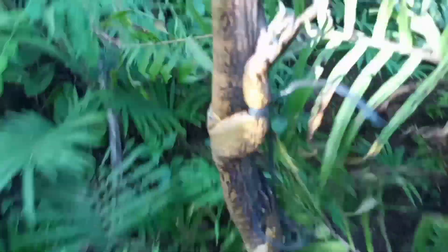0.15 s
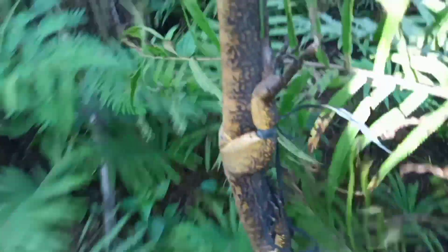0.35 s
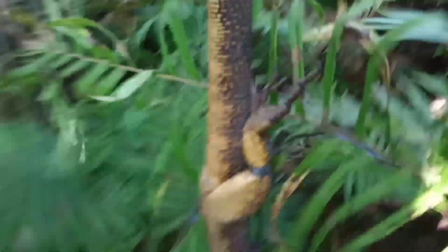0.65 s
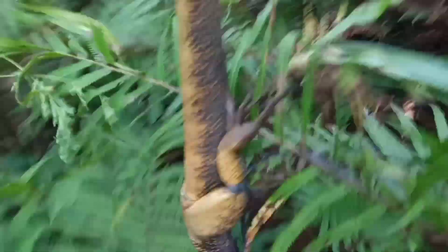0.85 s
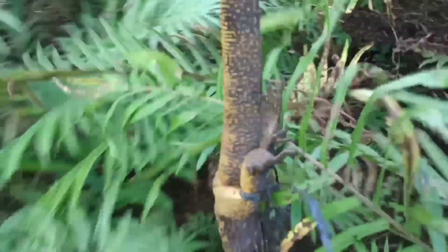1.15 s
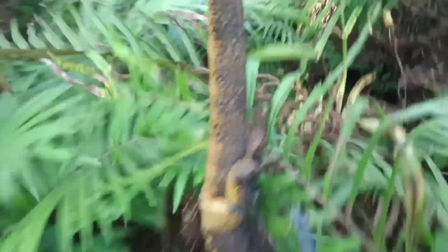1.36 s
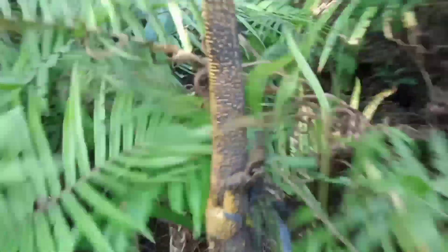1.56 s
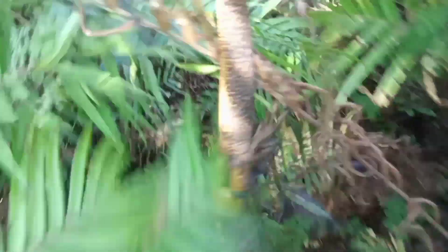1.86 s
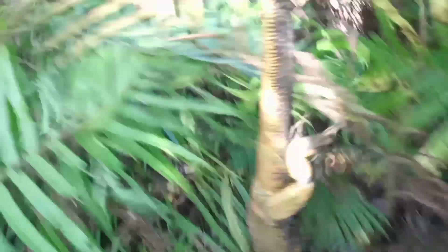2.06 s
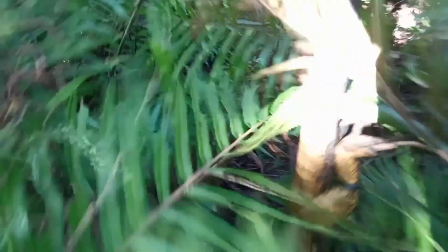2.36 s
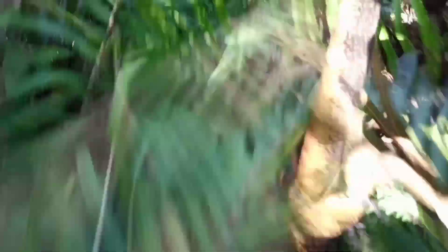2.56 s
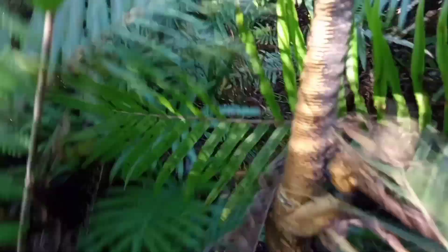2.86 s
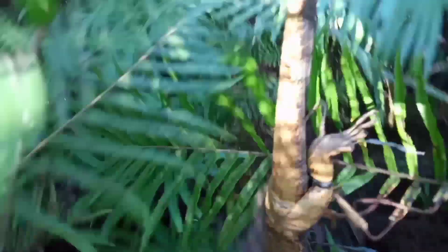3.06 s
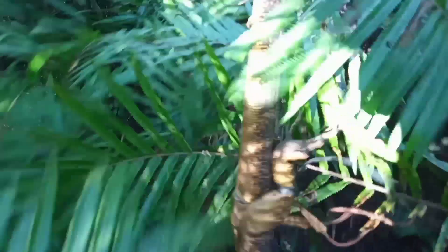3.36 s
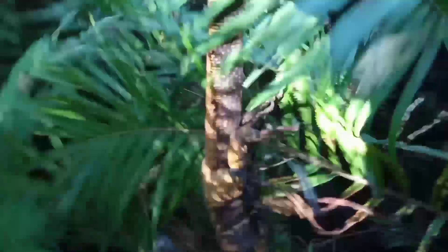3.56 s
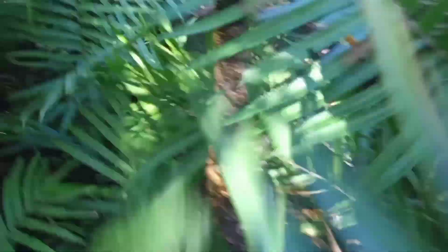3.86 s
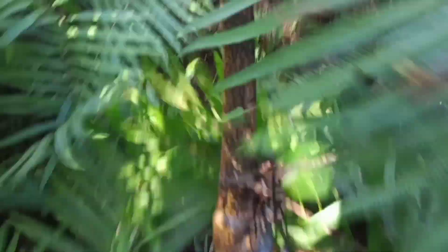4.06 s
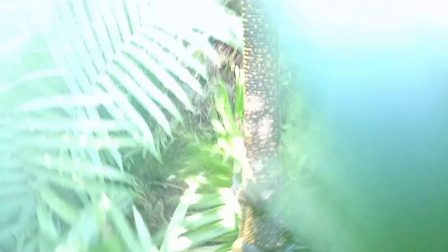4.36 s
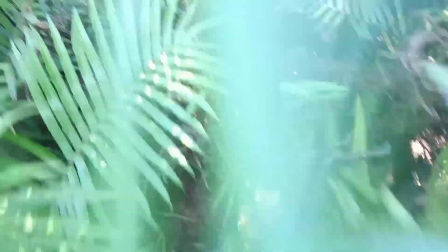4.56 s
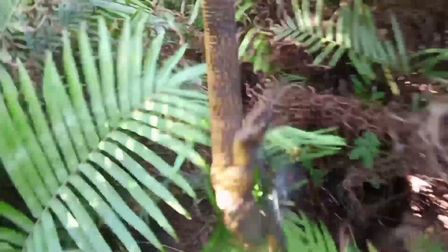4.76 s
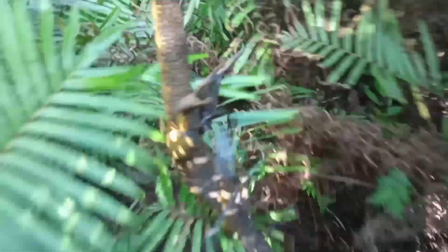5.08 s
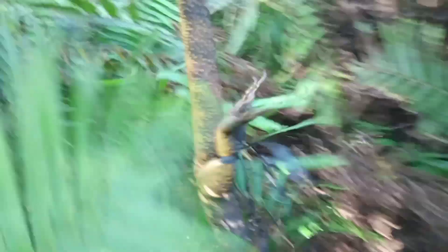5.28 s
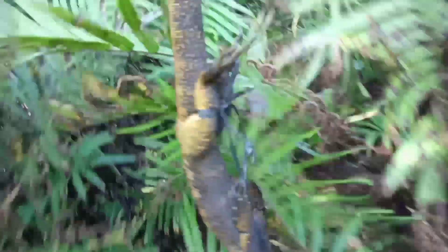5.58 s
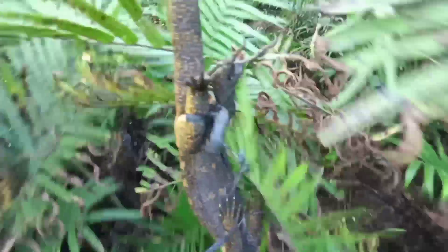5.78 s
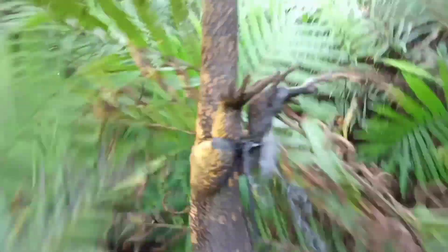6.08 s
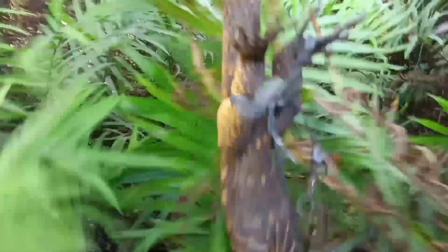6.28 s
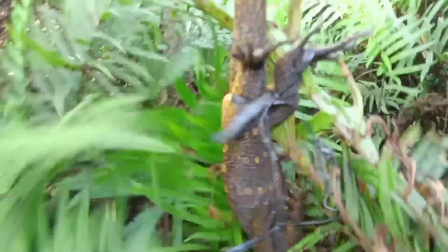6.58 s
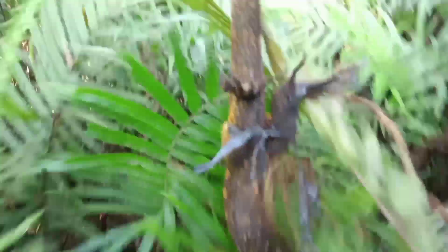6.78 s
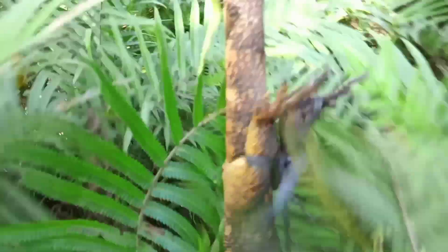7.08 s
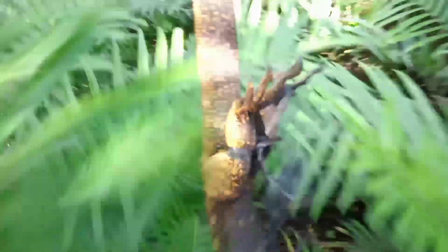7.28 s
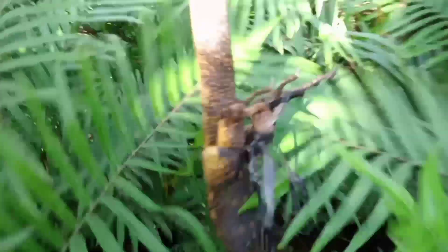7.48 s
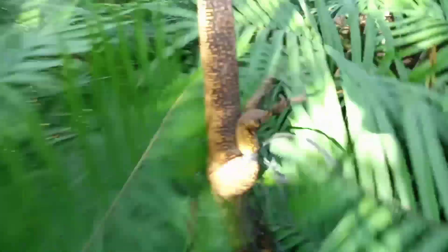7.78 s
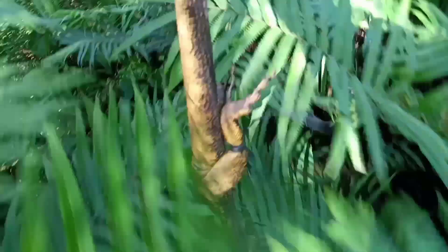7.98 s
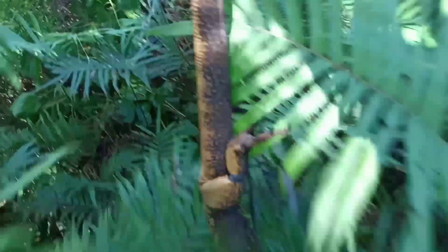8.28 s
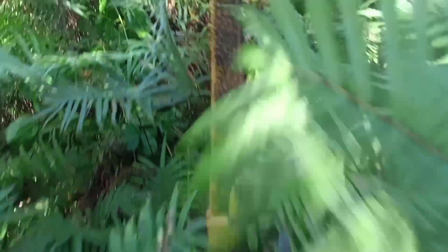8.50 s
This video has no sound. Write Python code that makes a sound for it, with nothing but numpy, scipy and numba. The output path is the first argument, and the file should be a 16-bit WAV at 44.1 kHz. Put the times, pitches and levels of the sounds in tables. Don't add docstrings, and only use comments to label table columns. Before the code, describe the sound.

Someone wades through chest-high dry ferns outdoors, the microphone inside a small hand-carried case. Leaves rustle continuously with tiny snaps and ticks, light at first, then denser. Stalks crack sharply just before three seconds, stems thump and drag on the case, and a heavy scrape follows near four and a half seconds. More knocks come at six and seven seconds, easing to soft rustling over a faint low rumble.

```python
import sys
import numpy as np
from scipy import signal
from scipy.fft import rfft, irfft
from scipy.io import wavfile
from scipy.ndimage import uniform_filter1d
from numba import njit

SR = 44100
rng = np.random.default_rng(int(sys.argv[2]) if len(sys.argv) > 2 else 0)


def level_to_linear(level):
    exponent = np.asarray(level, float) / 20
    return 10 ** exponent


def pcm_store(signal):
    levels = np.round(np.clip(np.atleast_2d(signal), -1, 1) * 32767)
    wavfile.write(sys.argv[1], SR, levels.astype(np.int16).T)


N = 381024

# frequency in Hz, density in dB per Hz.
RUMBLE_SPECTRUM = [(15, -54), (25, -2), (80, 13), (118, 5.5), (146, 8), (233, -22), (458, -13), (500, -13),
                   (650, -30), (1100, -120)]
RUMBLE_DB = -46

# frequency in Hz, gain in dB.
PORT_RESPONSE = [(300, -29.5), (500, -9.5), (800, -9), (1400, -7.5), (2000, -3.5), (3000, -1), (3750, 0.5),
                 (4500, -8.5), (5250, -10.5), (6500, -9), (8100, -3), (10500, -14), (14500, -14),
                 (15400, -16)]
# frequency in Hz, width in Hz, gain in dB.
CASE_MODES = [(120, 48, 1), (181, 45, -3), (279, 76, -7), (409, 470, -2.5)]

# middle in seconds, peak in dB, pitch in Hz.
THRUMS = [(.265, -23, 120), (.3, -26, 150), (.33, -28, 125), (2.722, -25, 690), (2.725, -25, 285),
          (2.762, -23, 135), (2.824, -24, 390), (2.872, -21, 225), (4.385, -26, 230), (4.41, -24, 135),
          (4.475, -24, 225), (4.49, -27, 480), (4.535, -21, 120), (4.567, -22, 210), (4.602, -16, 225),
          (4.624, -23, 480), (4.652, -20, 150), (4.652, -20, 390), (4.704, -15, 315), (4.729, -16, 300),
          (4.732, -17, 600), (4.747, -15, 360), (4.759, -19, 135), (4.881, -25, 405), (6.28, -22, 165),
          (6.342, -24, 180), (6.355, -25, 285), (6.38, -22, 390), (6.385, -19, 150), (6.405, -21, 270),
          (6.425, -20, 210), (6.427, -18, 390), (6.465, -23, 390), (6.47, -18, 255), (6.539, -25, 270),
          (6.649, -22, 210), (6.682, -15, 195), (6.719, -21, 180), (6.739, -21, 405), (6.764, -17, 180),
          (6.791, -24, 255), (7.05, -23, 270), (7.12, -13, 195), (7.155, -14, 255), (7.21, -23, 150)]
# time in seconds, peak in dB, hardness from 0 to 1, struck panel's pitch in Hz.
KNOCKS = [(0.219, -8, 0.14, 195), (0.23, -6.5, 0.65, 220), (0.238, -18, 0.7, 91.5), (1.601, -18.5, 1, 250),
          (1.891, -11, 0.56, 340), (2.551, -13.5, 0.93, 540), (2.948, -2.5, 0.75, 572),
          (2.96, -20, 0.8, 575), (3.701, 0, 0.42, 205), (3.715, -11, 0.8, 380), (3.774, -10.5, 0.73, 272),
          (4.591, -9.5, 0.36, 129), (4.695, -1, 0.14, 120), (4.716, -7, 0.3, 115), (4.853, -18, 0.2, 143),
          (6.1775, -2.5, 1, 720), (6.204, -11, 0.22, 135), (6.259, -15, 0.26, 129),
          (7.007, -12.5, 0.73, 161), (7.096, -1.5, 0.4, 223), (7.11, -7, 0.13, 205),
          (7.129, -10.5, 0.1, 121), (7.152, -1.5, 0.33, 112), (7.233, -14, 0.74, 186)]
# time in seconds, rise in seconds, fall in seconds, level in dB, upper modes in dB above it.
DRAGS = [(0, .01, 0.06, -33, 0), (.215, 0.024, .07, -26.5, -8), (.27, 0.05, 0.3, -29, -20),
         (5.52, 0.47, 0.27, -42.5, -15), (1.7, 0.48, 0.17, -41.5, -2), (1.89, .015, .14, -30.5, 1),
         (2.74, 0.19, 0.39, -31, 0), (2.9, 0.19, 0.27, -31.5, -4), (3.701, 0.012, 0.1, -24, -2),
         (4.09, 0.034, 0.25, -38.5, 1.5), (4.35, 0.011, .7, -31, -1), (4.63, .25, 0.18, -31, -0.5),
         (4.71, .03, 0.14, -23, 0), (4.87, 0.063, 0.07, -31, -2), (6.18, 0.027, 0.08, -34, 5),
         (6.25, .07, .15, -35, -14), (6.4, 0.085, 0.087, -29, -1), (6.47, 0.1, 0.2, -26, -3),
         (6.66, 0.08, 0.1, -28, -5), (6.74, 0.088, 0.12, -31, 0), (7.01, .01, 0.22, -33, 3),
         (7.105, 0.014, 0.11, -23, 0), (7.17, .05, 0.039, -28, -10), (7.22, .03, 0.12, -41, -18)]
DRAG_EDGE_DB = 19.5
CARRY_DB, CARRY_UPPER_DB = -48.5, -1.5
GRIT_DB = -12.

# start in seconds, length in seconds, pitch in Hz, width in Hz, level in dB.
ZIPS = [(0.69, 0.058, 3200, 2100, -27.5), (1.808, 0.024, 3750, 590, -26), (1.834, .022, 3750, 700, -27.5),
        (1.855, .028, 3600, 800, -23), (1.89, .045, 3300, 1500, -29), (3.296, 0.059, 1110, 540, -31.5),
        (4.71, 0.043, 3100, 2400, -25), (4.695, .015, 3300, 1300, -23), (0.547, 0.062, 3700, 740, -36),
        (1.68, .12, 3630, 1500, -31), (2.949, .021, 3500, 2000, -14.5), (2.789, 0.056, 1150, 350, -27.5),
        (6.397, 0.026, 2700, 1500, -28.5), (2.781, 0.0075, 3500, 700, -13), (4.194, 0.038, 1300, 1200, -32),
        (8.214, 0.052, 3500, 2500, -32), (8.372, .07, 3100, 2000, -35), (8.585, .025, 950, 1000, -37),
        (8.615, .024, 3200, 2000, -32), (4.63, 0.15, 480, 450, -27.5), (3.7, .06, 750, 560, -34),
        (1.885, .03, 1500, 1800, -31), (4.57, .1, 900, 700, -33), (7.09, 0.084, 294, 150, -26.5),
        (0.99, 0.017, 1600, 1800, -39)]
# start in seconds, length in seconds, pitch in Hz, width in Hz, level in dB.
FLUTTERS = [(0.666, 0.027, 8250, 1500, -40), (2.648, .035, 8000, 1800, -22.5),
            (4.733, 0.022, 6300, 4000, -21), (6.817, .02, 8400, 1800, -21.5), (5.79, .04, 7500, 4000, -34),
            (.115, .05, 6200, 2500, -39), (1.08, .06, 8200, 900, -36), (1.16, .05, 7300, 1500, -38),
            (1.53, .05, 6700, 800, -36), (4.705, .03, 6000, 4000, -26), (6.68, .15, 5900, 1500, -35),
            (4.98, .14, 5600, 2000, -42), (3.2, .1, 5800, 1500, -37), (7.6, .12, 5500, 2000, -43),
            (7.8, .5, 5800, 2000, -43), (.215, .014, 6500, 5000, -30), (2.46, .03, 6000, 900, -31),
            (7.19, .06, 8400, 1200, -30), (8.2, .07, 7500, 3000, -37)]
# start in seconds, length in seconds, first pitch in Hz, last pitch in Hz, level in dB.
SLIDES = [
    (0, .03, 2450, 2400, -39),
    (.02, .016, 2500, 2500, -34),
    (.034, .013, 2420, 2600, -25.5),
    (.047, .02, 2600, 2430, -27.5),
    (.066, .05, 2580, 2560, -35),
    (.115, .07, 2550, 2620, -40),
    (5.215, 0.19, 2260, 1650, -36.5),
    (5.34, 0.086, 1780, 2100, -31.5),
]
SLIDE_WIDTH_HZ = 330

# time in seconds, peak in dB, ring in
# Hz.
TICKS = [(.2104, -10, 8600), (.4319, -21, 8260), (.4843, -11, 9300), (.5884, -20, 8260), (.5821, -12, 8700),
         (.726, -14, 8600), (.8091, -15, 7500), (1.2451, -14, 6650), (1.536, -20, 9500), (1.721, -17, 8360),
         (1.8756, -15, 8420), (2.3082, -8, 8400), (6.8054, -13, 7440), (2.7393, -2.5, 8400),
         (2.7955, -2, 7980), (2.804, -2, 8000), (2.8684, -4, 7800), (2.8814, -5, 7990), (3.022, -18, 7780),
         (3.2013, -13, 8030), (3.9679, -13, 8500), (4.2627, -12, 8390), (4.6947, -9, 8280),
         (4.8444, -11, 8400), (5.8204, -11, 5050), (6.0417, -12, 7940), (6.623, -5.5, 7200),
         (6.8227, -0.5, 8240), (7.0473, -5, 8140), (7.7189, -16, 7740),
         (.052, -24, 8500), (.2992, -21, 10000), (.4572, -22, 7840), (.787, -19, 6000), (.4995, -15, 9600),
          (.5055, -19, 7600), (.513, -15, 9300), (.523, -18, 8000), (.527, -17, 7700), (.537, -16, 7900),
          (.5405, -13, 9400), (.553, -17, 8300), (.5575, -11, 8200), (.5615, -15, 9200), (.5655, -17, 8600),
          (.5745, -19, 7800), (.683, -16, 8000), (.757, -19, 8800), (.779, -19, 8600), (.8165, -16, 7700),
          (1.129, -19, 6100), (1.136, -18, 6000), (1.34, -21, 6400), (1.369, -23, 6300), (2.595, -11, 7400),
          (2.605, -11, 7000), (3.026, -12, 9600), (4.2996, -15, 9000), (5.401, -13, 8000), (5.8, -15, 5200),
          (7.145, -10, 9000)]
# time in seconds, peak in dB, ring in Hz, hollow body in dB above
CRACKS = [(.2094, -17, 1160, -14), (.2199, -9, 1710, -22), (.3755, -14.5, 1850, -20),
          (.6629, -20.5, 3830, -6), (.8445, -16, 3250, -22), (.8674, -20, 2340, -11),
          (1.0814, -17.5, 2260, -23), (1.296, -9, 2200, -19), (1.782, -18, 3410, -7),
          (1.7744, -21, 1300, -5), (2.0413, -16, 3770, -20), (2.2243, -15, 3920, -21),
          (2.3082, -7.5, 3170, -20), (2.382, -13, 3770, -25), (2.5513, -8.5, 3160, -5),
          (2.7831, 3.5, 3400, -12), (2.9467, 2, 2200, -11), (2.9524, 3, 3900, -13), (2.9589, 0, 3350, -27),
          (3.6925, -9, 2922, -29), (3.6974, -4, 980, -16), (4.2068, -18, 1656, -5), (4.564, -15, 3560, -6),
          (4.6947, -7, 3600, -8), (5.3406, -16.5, 1640, -11), (5.3842, -13, 3540, -4.5),
          (5.8197, -14, 3000, -31), (6.1779, -8, 1100, -4), (6.4023, -13, 2890, -31),
          (7.663, -17.5, 1210, -26),
          (.4838, -26, 3750, -25), (.5575, -25, 3700, -25), (.5821, -20, 3500, -25), (.902, -25, 3890, -20),
         (1.004, -22, 3900, -20), (1.394, -24, 2100, -15), (1.698, -19, 3960, -20), (1.895, -17, 1700, -4),
         (1.914, -14, 3500, -15), (2.542, -12, 3660, -25), (2.785, -12, 1230, -8), (3.267, -17, 2870, -20),
         (3.337, -16, 2500, -8), (4.452, -14, 3190, -20), (4.835, -17, 3770, -20), (5.084, -21, 1340, -20),
         (5.193, -22, 2620, -20), (5.371, -13, 2010, -20), (5.401, -14, 2600, -10), (5.749, -16, 3340, -20),
         (6.1779, -12, 1550, -20), (6.8, -14, 2350, -9), (6.825, -18, 1400, -15), (6.854, -17, 2600, -20),
         (7.004, -14, 3000, -12), (7.32, -15, 3660, -20), (8.594, -26, 1500, -6), (8.602, -26, 1500, -6)]

# time in seconds, pressure in dB, dryness of the fronds in dB.
WADE = [(0, -43, -0.5), (.45, -40.5, -3), (.96, -37, -4), (1.65, -38.5, -2), (2.0, -35, -4.5),
        (2.4, -29.5, 0.5), (3.13, -29.5, -1), (3.51, -30, -2), (4.06, -35, -2), (4.42, -31.5, -2),
        (4.86, -34.5, 1), (4.95, -38, -0.5), (5.3, -32.5, -3), (6.12, -32, 0.5), (6.3, -29.5, -3),
        (7.25, -27.5, -2), (7.66, -34, -3.5), (8.64, -34, -3.5)]
# time in seconds, rise in seconds, fall in seconds, pressure in dB, dryness in dB.
SWEEPS = [(.14, .04, .08, -40, 2), (.21, 0.04, 0.037, -33, -3), (.56, .08, .05, -50, 11),
          (.72, .1, 0.1, -35, -1), (1.11, .12, 0.22, -38.5, 5), (1.3, 0.015, 0.1, -36.5, 2.5),
          (1.72, .04, 0.14, -38, 8), (1.9, 0.11, 0.067, -31.5, 5.5), (2.19, 0.038, 0.3, -34.5, -4),
          (2.48, 0.12, .03, -33.5, 2.5), (2.72, 0.12, 0.059, -24.5, -0.5), (2.8, .03, 0.19, -26.5, 1),
          (2.98, 0.15, 0.081, -31.5, 7), (3.39, 0.13, 0.11, -46, -4), (4.11, .05, 0.067, -35.5, 1.5),
          (4.5, 0.076, 0.22, -27, 0), (4.6, 0.092, 0.15, -24.5, -7), (4.74, 0.085, 0.029, -24.5, -2),
          (5.41, 0.23, 0.019, -31, -4.5), (5.48, 0.019, 0.28, -30.5, -0.5), (6.16, .03, 0.24, -27.5, 1),
          (6.83, 0.27, 0.017, -29, 3.5), (7.04, 0.11, 0.17, -35.5, 7), (7.73, 0.08, 0.14, -37, 4),
          (8.12, 0.7, 0.37, -32, -3)]
SWEEP_EDGE_DB = 10
EDGE_SHAPE = 1.18
# time in seconds, snaps in dB over the hiss.
CRISPNESS = [(0, 1), (1.6, 2), (2.1, -1.5), (3.2, -2), (4.8, -1.5), (5.6, -3), (7.2, -3), (8.64, -3.5)]
# level in dB above the pressure, gain in dB per dB of dryness.
RUSTLE_PARTS = [(-10.5, 0.33), (-0.5, 0), (-0.5, 1), (-5.5, 1.12)]
RUSTLE_EDGES_HZ = (1550, 5200, 10000)


def level(x):
    return x / np.sqrt(np.mean(x ** 2))


def columns(table):
    s, *rest = np.transpose(table)
    return [np.interp(np.arange(N) / SR, s, c) for c in rest]


def walk(rate, count=8):
    steps = np.repeat(rng.standard_normal(int(N / SR * rate) + 2), count)
    steps = uniform_filter1d(uniform_filter1d(steps, count), count)
    return np.interp(np.arange(N) / SR * rate * count, np.arange(len(steps)), level(steps))


def ring(x, hz, width):
    return signal.lfilter(*signal.iirpeak(hz, hz / width, fs=SR), x)


def dull(x, hz):
    return signal.sosfilt(signal.butter(4, hz, fs=SR, output="sos"), x)


def colour(x, points, size=2048):
    hz, db = np.transpose(points)
    bins_hz = np.arange(size // 2 + 1) * SR / size
    gain = level_to_linear(np.interp(np.log(bins_hz + 1), np.log(hz), db))
    cep = irfft(np.log(gain))
    cep[1:size // 2] *= 2
    cep[size // 2 + 1:] = 0
    response = irfft(np.exp(rfft(cep)))
    return signal.fftconvolve(x, response)[:len(x)]


def between(spectrum, edges_hz, steep=3):
    octave = np.log2(np.arange(len(spectrum)) * SR / N + 1)
    slopes = [np.clip(.5 + steep * (octave - np.log2(edge)), 0, 1) for edge in edges_hz]
    above = [1, *slopes, 0]
    return [irfft(spectrum * (lower - upper), N) for lower, upper in zip(above, above[1:])]


def swells(rows, db, edge_db):
    t = np.arange(0, N, 32) / SR
    power = 0
    for (s, rise, fall, *_), top in zip(rows, db):
        away = np.maximum((s - t) / max(rise, .005), (t - s) / max(fall, .005))
        power = power + level_to_linear(2 * (top - edge_db * away ** EDGE_SHAPE))
    return np.interp(np.arange(N) / SR, t, power)


def snaps(rate, spread_db):
    hit = rng.random(N) < rate / SR
    sign = np.sign(rng.standard_normal(N))
    return hit * sign * level_to_linear(spread_db * np.minimum(rng.exponential(size=N), 3.8))


@njit
def grains(start, hz, cycles, size):
    out = np.zeros(N + 4096)
    for g in range(len(start)):
        p = np.exp((2j * np.pi - 1 / cycles[g]) * hz[g] / SR)
        z = size[g] + 0j
        for i in range(min(4096, int(5 * cycles[g] * SR / hz[g]))):
            z *= p
            out[start[g] + i] += z.imag
    return out[:N]


def burst(t60, splinter, size=1800):
    fade = np.exp(-np.log(1000) * np.arange(size) / SR / t60)
    x = splinter * rng.standard_normal(size) * fade
    x[0] = 1
    return x


def add(out, s, sound, peak_db):
    i = int((s + .0006) * SR)
    out[i:i + len(sound)] += (level_to_linear(peak_db) * sound / np.abs(sound).max())[:N - i]


def far_rumble(swell_db=1.5):
    bed = colour(rng.standard_normal(N), RUMBLE_SPECTRUM, size=8192)
    return level_to_linear(RUMBLE_DB + swell_db * walk(2.6)) * level(bed)


def thrums(gain_db=-2.5, length_200_s=.034, shorter=.4):
    out = np.zeros(N)
    for (s, db, hz), turn in zip(THRUMS, rng.random(len(THRUMS))):
        length = length_200_s * (200 / hz) ** shorter
        t = np.arange(int(length * SR)) / SR
        swell = np.sin(np.pi * t / length) ** 2
        add(out, s - length / 2, swell * np.sin(2 * np.pi * (hz * t + turn)), db + gain_db)
    return out


def case_modes(force):
    return [level_to_linear(db) * ring(force, hz, width) for hz, width, db in CASE_MODES]


def knocks(gain_db=-2.0, soft_s=0.0056, hard_s=0.00069, panel_db=9.5, width=0.19):
    out = np.zeros(N)
    for s, db, hardness, hz in KNOCKS:
        length = soft_s * (hard_s / soft_s) ** np.clip(hardness, 0, 1)
        push = np.sin(np.pi * np.clip(np.arange(3000) / SR / length, 0, 1)) ** 2
        panel = level_to_linear(panel_db) * ring(push, hz, width * hz)
        add(out, s, sum(case_modes(push)) + panel, db + gain_db)
    return out


def drag(rate=150., spread_db=2.5, smooth_db=-0.5, judder_db=3.0):
    slips = level(snaps(rate, spread_db)) + level_to_linear(smooth_db) * rng.standard_normal(N)
    force = level_to_linear(judder_db * walk(30)) * slips
    modes = case_modes(ring(ring(force, 216, 460), 226, 600))
    db, upper_db = np.transpose(DRAGS)[3:]
    low = np.sqrt(level_to_linear(2 * CARRY_DB) + swells(DRAGS, db, DRAG_EDGE_DB))
    upper = np.sqrt(level_to_linear(2 * (CARRY_DB + CARRY_UPPER_DB)) + swells(DRAGS, db + upper_db, DRAG_EDGE_DB))
    return low * level(modes[0] + modes[1]) + upper * level(modes[2] + modes[3])


def zips(rate=3000., spread_db=3.0, top_hz=4760.0):
    low, bright = np.zeros(N), np.zeros(N)
    clicks, scatter = snaps(rate, spread_db), rng.standard_normal(N)
    every = np.flatnonzero(clicks)
    runs = [(s, length, hz, hz, width, db) for s, length, hz, width, db in ZIPS + FLUTTERS]
    runs += [(*slide, SLIDE_WIDTH_HZ, db) for *slide, db in SLIDES]
    for s, length, from_hz, to_hz, width, db in runs:
        start = every[(every > s * SR) & (every < (s + length) * SR)]
        along = (start / SR - s) / length
        hz = from_hz + (to_hz - from_hz) * along + width / 4 * scatter[start]
        run = grains(start, hz, 0.63 * hz / width, clicks[start] * np.sin(np.pi * along))
        run = ring(run, (from_hz + to_hz) / 2, 2.5 * width + abs(to_hz - from_hz))
        out = bright if from_hz > top_hz else low
        out += level_to_linear(db) * run * np.sqrt(length * SR / np.sum(run ** 2))
    return dull(low, top_hz) + ring(bright, 8000, 7000)


def leaf_tips(gain_db=-5.5, t60=0.01, splinter=0.6, width=0.25, top_db=-12):
    out = np.zeros(N)
    for s, db, hz in TICKS:
        x = burst(t60, splinter, size=800)
        tick = ring(ring(x, hz, width * hz), hz, width * hz)
        add(out, s, tick + level_to_linear(top_db) * ring(x, 10000, 6000), db + gain_db)
    return out


def crack_t60(db, hz):
    shorter_db = 0.35 * db + 0.8 * np.log2(hz / 1000)
    return np.clip(.017 * level_to_linear(-shorter_db), .004, .07)


def stalks(gain_db=0., splinter=0.21, width=0.4, body_hz=720.0, edge_db=-6.5):
    out = np.zeros(N)
    for s, db, hz, body_db in CRACKS:
        x = burst(crack_t60(db, hz), splinter)
        edge = level_to_linear(edge_db) * ring(ring(x, 2500, 5300), 2500, 6000)
        pitched = ring(ring(x, hz, width * hz), hz, 2 * width * hz)
        body = ring(ring(x, body_hz, 670), body_hz, 910)
        add(out, s, dull(edge + pitched, min(4700, 2.4 * hz)), db + gain_db)
        add(out, s, body, db + body_db + gain_db)
    return out


def grit():
    db, upper_db = np.transpose(DRAGS)[3:]
    return swells(DRAGS, db + upper_db + GRIT_DB, DRAG_EDGE_DB)


def rustle_gains():
    pressure_db, dry_db = columns(WADE)
    sweep_db, sweep_dry_db = np.transpose(SWEEPS)[3:]
    powers = []
    for db, share in RUSTLE_PARTS:
        wading = level_to_linear(2 * (pressure_db + share * dry_db))
        sweeping = swells(SWEEPS, sweep_db + share * sweep_dry_db, SWEEP_EDGE_DB)
        powers.append(level_to_linear(2 * db) * (wading + sweeping))
    powers[0] = powers[0] + grit()
    return np.sqrt(powers)


def leaflet_cloud(rate=4000., spread_db=3., cycles=2.3):
    size = snaps(rate, spread_db)
    start = np.flatnonzero(size)
    hz = 500 * 32 ** rng.random(N)[start] ** .7
    cloud = grains(start, hz, cycles * 5 ** rng.random(N)[start], size[start] * hz ** 1.54)
    spectrum = rfft(cloud)
    power = uniform_filter1d(np.abs(spectrum) ** 2, 3000)
    return irfft(spectrum / np.sqrt(power + power.max() * 1e-6), N)


def fronds(gust_db=0.71, patch_db=1.69, flutter_db=0.93, stutter_db=1.0):
    cloud = leaflet_cloud()
    scrape = level_to_linear(gust_db * walk(14) + flutter_db * walk(40) + stutter_db * walk(130))
    crisp = level_to_linear(columns(CRISPNESS)[0])
    mix = (crisp * level(cloud) + rng.standard_normal(N)) / np.sqrt(1 + crisp ** 2)
    heard = colour(scrape * mix, PORT_RESPONSE)
    patches = between(rfft(heard), 800 * 2 ** (np.arange(13) / 3), steep=6)
    patchy = sum(level_to_linear(patch_db * walk(12)) * p for p in patches)
    parts = between(rfft(patchy), RUSTLE_EDGES_HZ)
    return sum(gain * level(part) for gain, part in zip(rustle_gains(), parts))


def scene():
    heard = far_rumble() + thrums() + knocks() + drag()
    heard = heard + zips() + leaf_tips() + stalks() + fronds()
    return np.array([heard, heard])


def low_pass(x):
    return signal.sosfilt(signal.butter(12, 15800, fs=SR, output="sos"), x)


def record(dry):
    x = signal.sosfilt(signal.butter(2, 85, "high", fs=SR, output="sos"), dry)
    x = np.clip(x + .9 * ring(x, 15350, 600), -.95, .95)
    x = signal.sosfilt(signal.ellip(8, .5, 32, 15450, fs=SR, output="sos"), x)
    return low_pass(x)


dry = scene()
out = record(dry)
pcm_store(out)
```